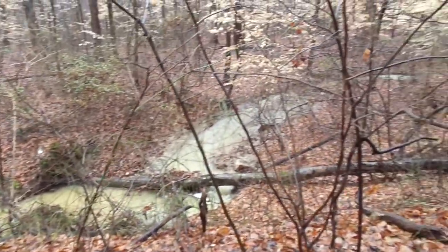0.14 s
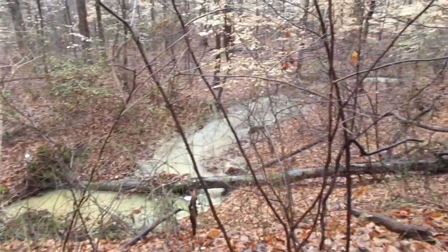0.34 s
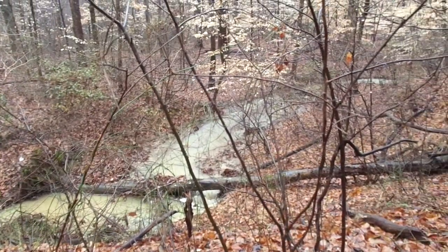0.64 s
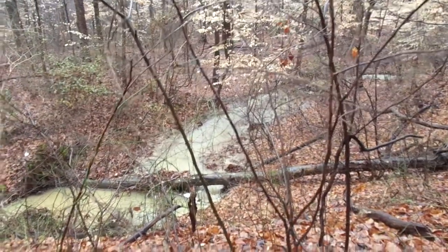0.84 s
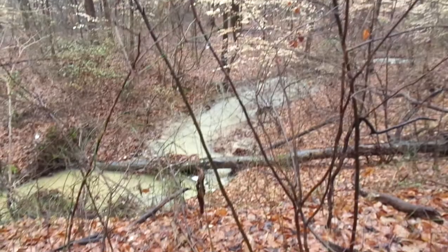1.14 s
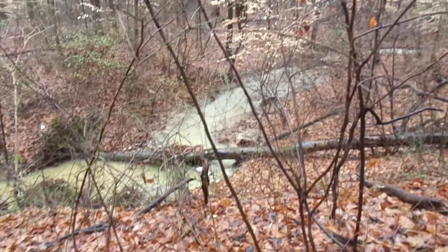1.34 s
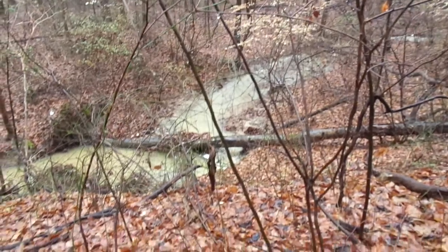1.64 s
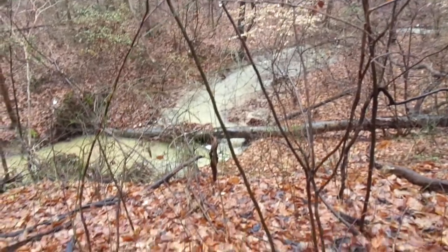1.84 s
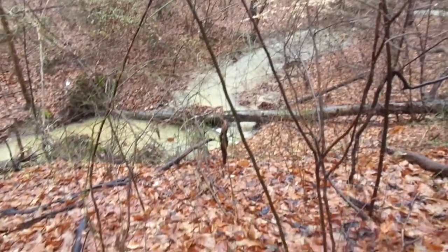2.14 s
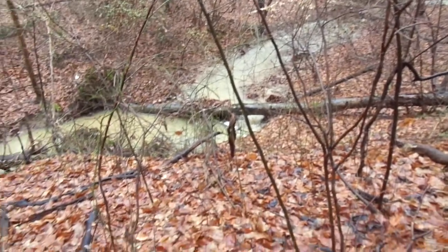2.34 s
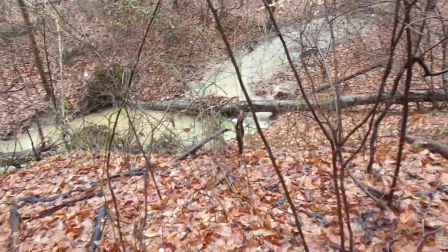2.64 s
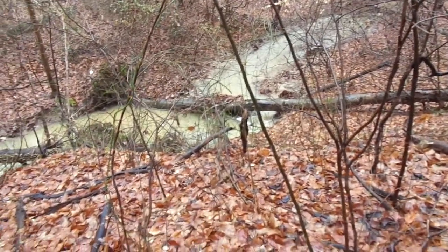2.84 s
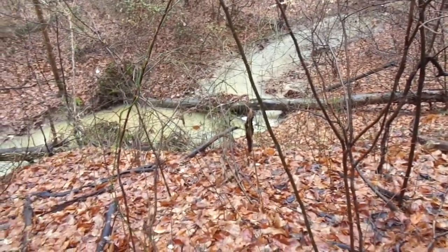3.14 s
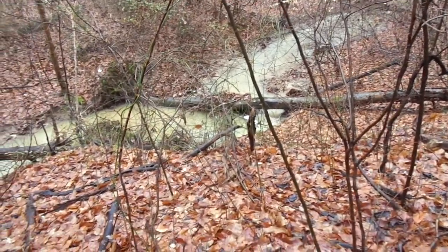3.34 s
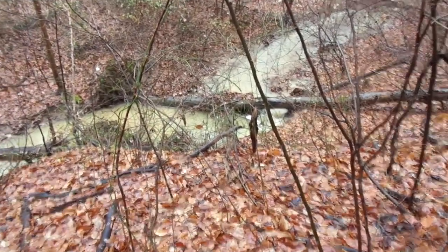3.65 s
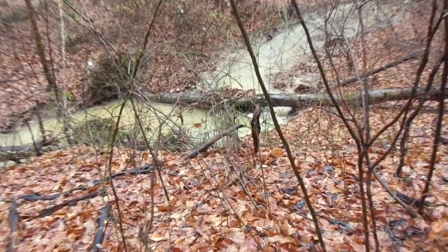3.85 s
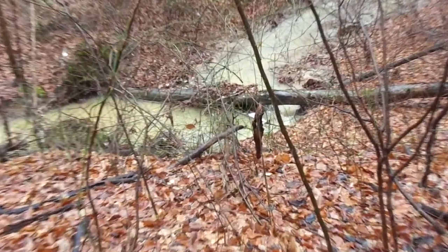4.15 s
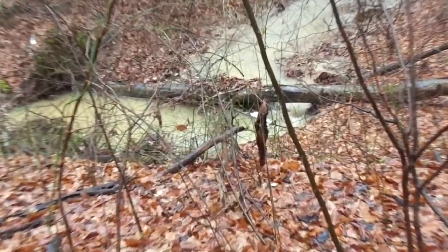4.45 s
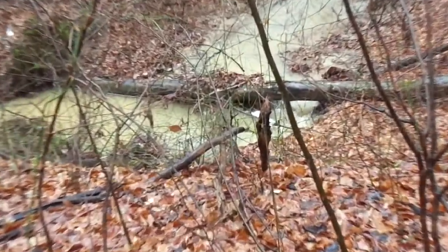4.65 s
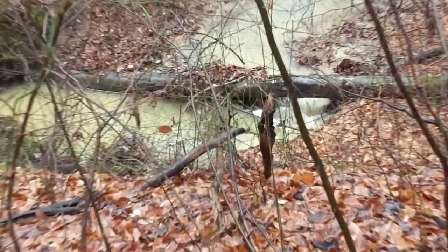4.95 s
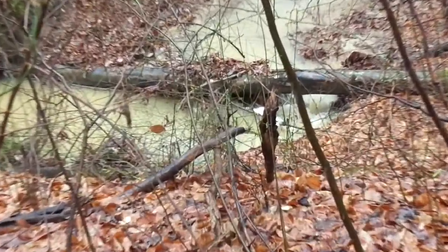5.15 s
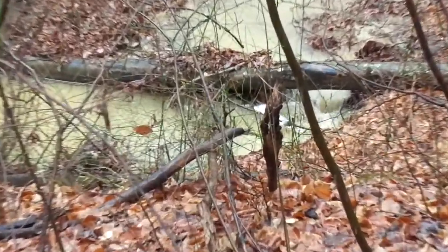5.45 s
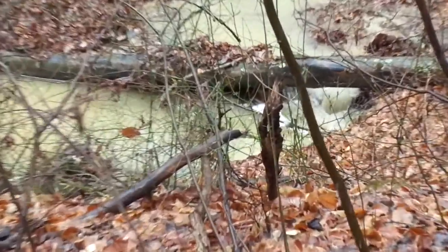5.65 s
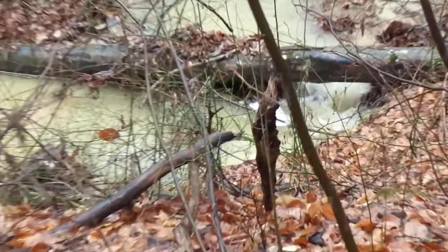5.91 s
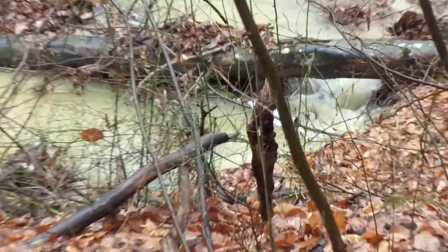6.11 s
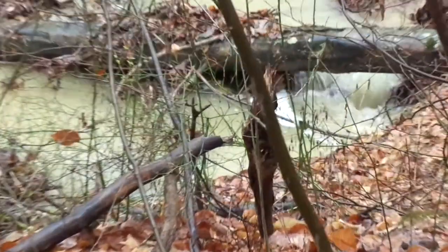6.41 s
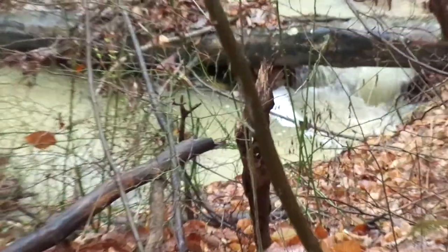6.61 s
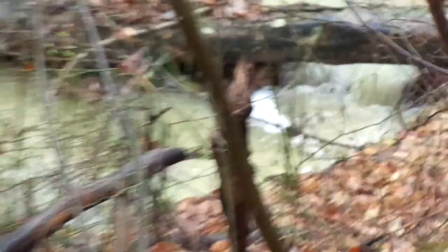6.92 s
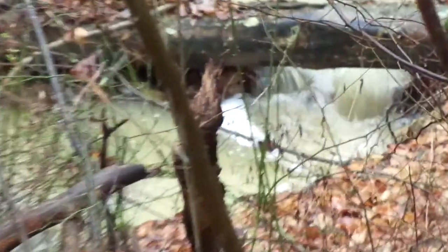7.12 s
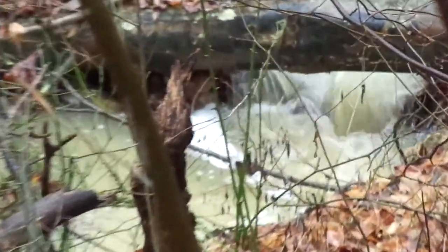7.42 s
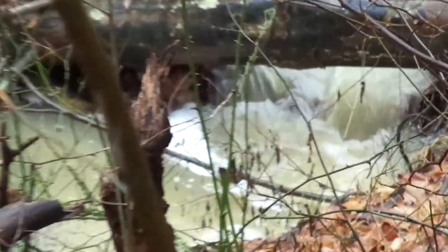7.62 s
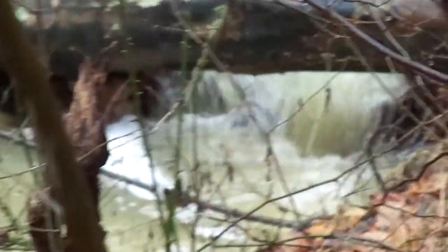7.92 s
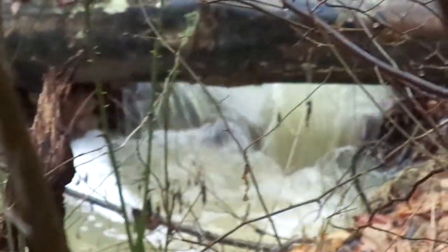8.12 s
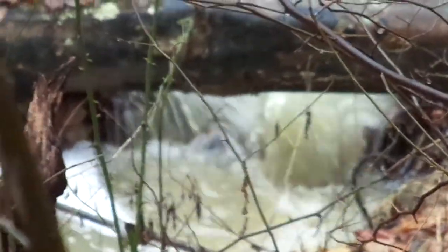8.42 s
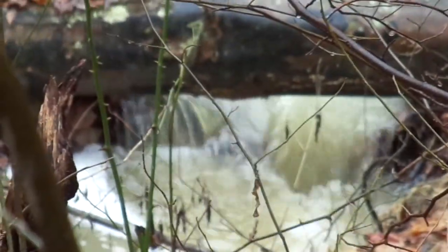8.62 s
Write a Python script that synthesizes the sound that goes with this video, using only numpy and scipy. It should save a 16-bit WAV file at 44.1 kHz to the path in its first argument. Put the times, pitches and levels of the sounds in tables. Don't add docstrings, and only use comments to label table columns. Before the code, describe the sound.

Constant rushing water in open woodland, heard from a handheld camera at unchanging distance. Small dry ticks lead to a sharp splintering branch, then scattered clicks. A thin airy motor whir runs through the later part, buzzing and knocking at times, over two short bursts of muffled wind popping. A hard twig snap precedes the motor stopping, followed by a brief crunch of leaves.

```python
import sys
import numpy as np
from scipy import signal
from scipy.io import wavfile
from scipy.ndimage import uniform_filter1d

SR = 44100
rng = np.random.default_rng(int(sys.argv[2]) if len(sys.argv) > 2 else 0)


def pcm_store(signal):
    levels = np.round(np.clip(np.atleast_2d(signal), -1, 1) * 32767)
    wavfile.write(sys.argv[1], SR, levels.astype(np.int16).T)


def gain_from_decibels(decibels):
    exponent = np.asarray(decibels, float) / 20
    return 10 ** exponent


N = 386757
TIME = np.arange(N) / SR
HZ = np.fft.rfftfreq(1024, 1 / SR)[:, None]
FRAMES = np.arange(0, N + 256, 256).clip(0, N - 1)

# frequency in Hz, density in dB per Hz.
RUSH = [(25, -14), (90, -5), (310, -4), (450, -6), (750, -3.5), (1250, -2.5), (1500, -5.5), (1750, -5),
        (2050, -10), (2500, -5), (3200, -6.5), (3900, -13.5), (8500, -20), (15000, -22.5)]
# time in seconds, level in dB.
FLOW = [
    (0.0, -47),
    (2.39, -46.3),
    (4.49, -47),
    (7.79, -45.5),
    (8.77, -47),
]
SPRAY_DB, SURGE_DB = -1, 1
BUBBLES_PER_S, BUBBLES_DB = 560, -11
FIZZ_PER_S, FIZZ_DB = 1200, -9.5


def creek():
    level_db = follow(FLOW)
    bubbles = gain_from_decibels(BUBBLES_DB) * grains(BUBBLES_PER_S, 520, 2600, cycles=7.0, spread_db=2.5, glide=.04)
    fizz = gain_from_decibels(FIZZ_DB) * grains(FIZZ_PER_S, 3300, 12000, cycles=3.3, spread_db=4.5, glide=.024)
    rush = rng.standard_normal(N)
    hz, colour_db = np.transpose(RUSH)
    water_db = np.interp(np.log(HZ + 1), np.log(hz), colour_db)
    spray_db = np.clip(np.log2((HZ + 1) / 3000), 0, 1) * SPRAY_DB
    surge_db = SURGE_DB / (1 + (HZ / 520) ** 6)
    field_db = water_db + spray_db + surge_db
    return gain_from_decibels(level_db + 1) * shaped(rush + bubbles + fizz, field_db, patchy_db=1.5, flicker_db=.73)


def grains(per_s, low_hz, high_hz, cycles, spread_db, glide, count=12):
    which = rng.integers(0, count, N)
    size_db = spread_db * np.minimum(rng.exponential(1, N), 4)
    size = gain_from_decibels(size_db) * (rng.random(N) < per_s / SR)
    out = np.zeros(N)
    for k, hz in enumerate(np.geomspace(low_hz, high_hz, count)):
        u = np.arange(int(3 * cycles / hz * SR)) * hz / SR / cycles
        wavelet = u * np.exp(-3 * u) * np.sin(2 * np.pi * cycles * u * (1 + glide * u))
        out += signal.oaconvolve(size * (which == k), wavelet / np.linalg.norm(wavelet))[:N]
    return evened(out)


# time in seconds, level in dB.
LOAD = [
    (2.9, -53),
    (3.5, -54.5),
    (4.9, -56.5),
    (6.2, -54),
    (7.0, -55),
    (8.0, -54),
    (8.13, -52),
]
# frequency in Hz, width in Hz, level in dB.
BARREL = [(4230, 940, -3), (4920, 600, -2), (5740, 970, -0.5), (7050, 1200, 1.5), (8820, 2400, -3),
          (11340, 860, -5.5), (12280, 1060, -1), (13000, 900, -1.5)]
# middle in seconds, swell in dB, half length in seconds.
STIFF = [
    (4.2, 12, .5),
    (5.8, 6, .6),
    (7.0, 15, .6),
]
# start in seconds, peak in dB.
BINDS = [
    (5.618, -32),
    (5.798, -35),
    (5.828, -37),
    (5.857, -36),
    (5.885, -34),
    (6.398, -35),
    (6.652, -34),
    (7.273, -36),
]
ZOOM_START_S, ZOOM_END_S, RAMP_S, IDLE_DB = 2.87, 8.15, .025, -90
BARREL_LENGTH, BARREL_DRIFT_PER_S = .99, -.002
BUZZ_HZ, BUZZ_T60, BUZZ_DB = 1516, .03, -9
SHAFT_HZ, THROB = 33.3, [.12, .14, .18]


def lens_motor():
    running = np.clip(np.minimum(TIME - ZOOM_START_S, ZOOM_END_S - TIME) / RAMP_S, 0, 1)
    level_db = IDLE_DB + running * (follow(LOAD) - IDLE_DB)

    throb = np.ones(N)
    for k, depth in enumerate(THROB):
        throb += depth * np.cos(2 * np.pi * (k + 1) * SHAFT_HZ * TIME + k)
    length = (BARREL_LENGTH + BARREL_DRIFT_PER_S * (TIME - ZOOM_START_S))[FRAMES]
    barrel = sum(gain_from_decibels(2 * db) / (1 + (2 * (HZ - hz * length) / width) ** 2) ** 2 for hz, width, db in BARREL)
    housing = 1 + (HZ / 13300) ** 60
    field_db = 10 * np.log10(barrel / housing)
    whir = shaped(throb * rng.standard_normal(N), field_db, patchy_db=2.1, flicker_db=1.3)

    buzz_db = BUZZ_DB + sum(db * np.exp(-((TIME - s) / half) ** 2) for s, db, half in STIFF)
    turn = np.floor(SHAFT_HZ * TIME + .7).astype(int)
    strength = gain_from_decibels(3.6 * rng.standard_normal(400))
    knocks = np.diff(turn, prepend=0) * strength[turn]
    rattle = signal.oaconvolve(knocks, ring(BUZZ_HZ, BUZZ_T60, rise=.001))[:N]
    buzz = gain_from_decibels(buzz_db - 7) * evened(rattle)

    out = gain_from_decibels(level_db) * (whir + buzz)
    for s, db in BINDS:
        add(out, s, gain_from_decibels(db + 2.5) * ring(BUZZ_HZ, BUZZ_T60, rise=.0006))
    return out


# frequency in Hz, level in dB, t60 in seconds.
TWIG = [(1515, -1, 0.02), (2125, 0.5, 0.02), (2570, -8, 0.013), (3295, -7, .014), (3900, -10, 0.016),
        (4740, -14, 0.022), (5620, -1.5, 0.0093), (6800, -11, .008), (8500, -15, .01), (9900, -17, 0.0095)]
SNAP_S, SNAP_DB = 7.7765, -7.5


def twig_snap(out):
    modes = [(-1) ** k * gain_from_decibels(db) * ring(hz, t60, rise=.00016) for k, (hz, db, t60) in enumerate(TWIG)]
    add(out, SNAP_S, gain_from_decibels(SNAP_DB) * sum(modes))


# start in seconds, peak in dB, low ring in Hz, crack against the low ring in
# dB.
TICKS = [(0.499, -30.5, 929, -14), (0.638, -33, 1090, -12), (1.279, -34.5, 1180, -14),
         (1.335, -29.5, 1020, -13), (1.389, -37, 1660, -4), (1.505, -23, 1140, -1),
         (1.586, -25.5, 1480, -1), (2.079, -26.5, 1630, -1), (2.232, -36, 1110, -8), (2.394, -32, 1740, -2),
         (2.809, -25.5, 1450, -14), (4.148, -32, 1200, 7), (5.109, -37, 1140, 2), (5.382, -32.5, 1100, -1),
         (6.127, -32, 1090, -4), (6.26, -20.5, 1300, -13), (6.312, -37, 760, -1), (6.92, -33, 1230, -10),
         (7.065, -33, 716, -6), (7.114, -28, 1200, 3), (7.209, -27, 826, -13), (7.342, -29, 1250, -8),
         (7.715, -33, 902, -7), (7.728, -29, 692, 0), (8.183, -36, 1690, -11), (8.664, -38, 1240, 5)]
# start in seconds, peak in dB, low ring in Hz, crack in Hz, crack against the low
# ring in dB.
SPLINTERS = [(1.5825, -31, 1100, 4400, 4), (1.6313, -4, 1410, 3900, 13), (1.6326, -22, 1310, 3700, 3),
             (1.635, -24, 1700, 2600, -15), (1.6463, -22, 1900, 4000, -13), (1.6487, -16, 1890, 2600, -10),
             (1.648, -27, 720, 2400, -10), (1.6563, -21, 1220, 4300, -10), (1.664, -21, 1250, 4200, -12),
             (1.669, -32, 1200, 2400, -10), (1.6995, -35, 3400, 9000, 3), (7.35, -30, 1200, 2500, -10),
             (7.837, -38, 3000, 8000, 5)]
# start in seconds, peak in dB, low ring in Hz, crack in
# Hz, crack against the low ring in dB.
BREAKS = [(.1172, -16, 1550, 3900, 0), (1.9436, -16.5, 900, 1250, 3), (1.9436, -29, 1450, 6000, -3),
          (2.6405, -24, 690, 3600, -3), (2.3764, -18.5, 1450, 3400, 1), (2.3766, -26, 700, 6000, -3),
          (7.6655, -13.5, 680, 1470, 2), (7.6652, -31, 1100, 5000, 5), (1.632, -26, 680, 2700, -3),
          (1.6545, -27, 670, 1200, -8), (1.6615, -27, 660, 1200, -8), (7.777, -24, 660, 1200, -8)]
TICK_T60, TICK_CRACK_HZ, TICK_CRACK_SPREAD = .021, 2800, .1
SPLINTER_CYCLES, BREAK_CYCLES = 20, 23
DAMP_HZ = 8500


def ticks_and_breaks():
    out = np.zeros(N)
    for s, db, hz, high_db in TICKS:
        chance = rng.standard_normal(900)
        high_hz = TICK_CRACK_HZ * (1 + TICK_CRACK_SPREAD * np.tanh(chance[-1]))
        add(out, s, tick(db, hz, TICK_T60, high_hz, high_db, chance))
    for rows, cycles in ((SPLINTERS, SPLINTER_CYCLES), (BREAKS, BREAK_CYCLES)):
        for s, db, hz, high_hz, high_db in rows:
            add(out, s, tick(db, hz, cycles / hz, high_hz, high_db, rng.standard_normal(900)))
    return signal.sosfilt(signal.butter(2, DAMP_HZ, fs=SR, output="sos"), out)


def tick(db, low_hz, t60, high_hz, high_db, chance):
    t = np.arange(len(chance)) / SR
    debris = .26 * chance * gain_from_decibels(-60 * t / (.5 * t60))
    fracture = debris - (t == 0)
    broad = resonate(resonate(fracture, .74 * high_hz, .87 * high_hz), .83 * high_hz, 1.22 * high_hz)
    crack = broad + 1.3 * resonate(fracture, high_hz, .088 * high_hz)
    body = ring(low_hz, t60) - .46 * ring(1.54 * low_hz, .48 * t60)
    add(body, 0, gain_from_decibels(high_db + 6.5) * crack / abs(crack).max())
    return gain_from_decibels(db) * body / abs(body).max()


# start in seconds, rms in dB, t60 in
# seconds, centre in Hz, width in Hz.
CRUNCHES = [(8.3412, -32, .03, 2000, 1100), (8.3458, -25.5, 0.035, 2360, 950),
            (8.348, -28, 0.036, 1550, 400), (8.345, -32, 0.04, 5500, 3000),
            (1.6315, -23, 0.016, 2700, 1200), (1.6311, -14, .006, 8800, 3000),
            (1.6538, -21.5, 0.022, 4050, 600), (1.6612, -21.5, 0.016, 4100, 550),
            (7.7768, -16, 0.013, 8500, 6800), (7.778, -22, 0.045, 1800, 900),
            (1.6485, -34, .012, 11000, 5000), (1.654, -31, .012, 13000, 3000),
            (1.6615, -32, .012, 10500, 3500), (1.6642, -31, .014, 12000, 5000)]
RISE_SHARE = .04


def crunches(out):
    t = np.arange(4000) / SR
    for s, db, t60, hz, width in CRUNCHES:
        chance = rng.standard_normal(4000)
        rough = chance * np.sqrt(abs(chance[::-1]))
        noise = evened(resonate(resonate(rough, hz, width), hz, 2 * width))
        shape = (1 - np.exp(-t / (RISE_SHARE * t60))) * gain_from_decibels(-60 * t / t60)
        add(out, s, gain_from_decibels(db) * noise * shape)


def undergrowth():
    out = ticks_and_breaks()
    crunches(out)
    twig_snap(out)
    t = np.arange(3000) / SR
    sparse = rng.choice([-1., 1.], 3000) * (rng.random(3000) < .06)
    echoes = sparse * gain_from_decibels(-60 * t / .035) * (t > .0012)
    out += gain_from_decibels(-17.5) * signal.oaconvolve(out, echoes / np.linalg.norm(echoes))[:N]
    return signal.sosfilt(signal.butter(3, [420, 14000], "band", fs=SR, output="sos"), out)


# middle in seconds, rms in dB, half length in seconds.
GUSTS = [(3.728, -38, .012), (3.765, -34, 0.011), (3.80, -43, .02), (3.849, -34, .022), (3.89, -44, .025),
         (3.985, -32, 0.027), (4.07, -47.5, .05), (4.192, -49, .04), (5.885, -40, 0.03),
         (5.958, -40.5, 0.048), (6.06, -45.5, 0.046)]
# middle in seconds, peak in dB.
POPS = [(3.7196, -19), (3.728, -28), (3.752, -26), (3.7623, -18), (3.77, -29), (3.8335, -27), (3.8402, -30),
        (3.856, -20), (3.9424, -30), (3.9746, -22.5), (3.9801, -19), (3.99, -15.5), (4.007, -26),
        (5.9463, -27.5), (5.9529, -32), (5.9638, -31)]
EDDY_HZ, EDDY_DB, EDDY_DB_PER_OCTAVE = 240, -42, 13
POP_WIDTH_S, POP_DB, POP_DB_PER_HALVING = .0022, -24, 13


def wind():
    out = np.zeros(N)
    t = (np.arange(9000) - 4500) / SR
    for s, db, half in GUSTS:
        top_hz = EDDY_HZ * 2 ** ((db - EDDY_DB) / EDDY_DB_PER_OCTAVE)
        lowpass = signal.butter(3, top_hz, fs=SR, output="sos")
        eddies = signal.sosfilt(lowpass, rng.standard_normal(9000))
        add(out, s - 4500 / SR, gain_from_decibels(db) * evened(eddies) * np.exp(-(t / half) ** 2))
    for s, db in POPS:
        width_s = POP_WIDTH_S * 2 ** ((POP_DB - db) / POP_DB_PER_HALVING)
        u = (np.arange(800) - 400) / SR / width_s
        add(out, s - 400 / SR, gain_from_decibels(db) * (1 - 2.14 * u ** 2) * np.exp(-(.97 * u) ** 2))
    return signal.sosfilt(signal.butter(2, 60, "high", fs=SR, output="sos"), out)


def shaped(x, field_db, patchy_db, flicker_db):
    z = signal.stft(x, nperseg=1024, noverlap=768)[2]
    patches, flicker = rng.standard_normal((2, *z.shape))
    patches = evened(uniform_filter1d(uniform_filter1d(patches, size=5, axis=0), size=12, axis=1))
    flicker = evened(uniform_filter1d(uniform_filter1d(flicker, size=120, axis=0), size=2, axis=1))
    z *= gain_from_decibels(field_db + patchy_db * patches + flicker_db * flicker)
    return evened(signal.istft(z, nperseg=1024, noverlap=768)[1][:N])


def ring(hz, t60, rise=.00018):
    t = np.arange(int(.12 * SR)) / SR
    return gain_from_decibels(-60 * t / t60) * (1 - np.exp(-t / rise)) * np.sin(2 * np.pi * hz * t)


def resonate(x, hz, width):
    turn = np.exp(2j * np.pi * np.cumsum(hz * np.ones(len(x))) / SR)
    r = np.exp(-np.pi * width / SR)
    smooth = signal.lfilter([1 - r], [1, -r], x / turn)
    return 2 * (turn * smooth).real


def follow(rows):
    s, level = np.transpose(rows)
    return np.interp(TIME, s, level)


def evened(x):
    return x / np.sqrt(np.mean(x ** 2) + 1e-20)


def add(mix, s, sound):
    part = mix[round(s * SR):][:len(sound)]
    part += sound[:len(part)]


def scene():
    return np.tile(creek() + lens_motor() + undergrowth() + wind(), (2, 1))


def low_pass(x):
    return signal.sosfilt(signal.butter(12, 16350, fs=SR, output="sos"), x)


EDGE_HZ = 15000
PARTS_PER_S, PART_S, PART_DB, PART_FOLLOW_DB = 3.6, .06, -66.5, -22


def record(dry):
    hiss = evened(signal.lfilter([1], [1, -.7], rng.standard_normal(N)))
    starts = 1. * (rng.random(N) < PARTS_PER_S / SR)
    parted = signal.oaconvolve(starts, signal.windows.tukey(round(PART_S * SR), .4))[:N]
    treble = np.sqrt(abs(uniform_filter1d(np.diff(dry[0], prepend=0) ** 2, size=900)))
    difference = gain_from_decibels(PART_DB) * np.minimum(parted, 1)
    difference += gain_from_decibels(PART_FOLLOW_DB) * np.maximum(treble - gain_from_decibels(-46), 0)
    edge = signal.firwin(801, EDGE_HZ, window=("kaiser", 3.5), fs=SR)[None]
    limited = signal.oaconvolve(dry + np.outer([1, -1], difference * hiss), edge, "same")
    return low_pass(limited)


dry = scene()
out = record(dry)
pcm_store(out)
```